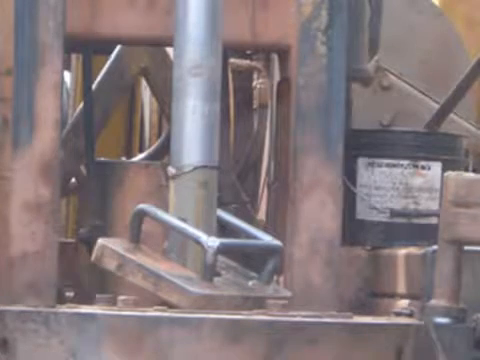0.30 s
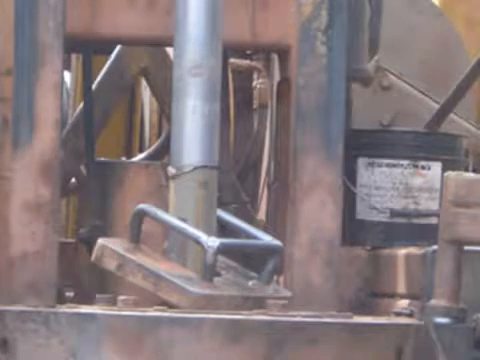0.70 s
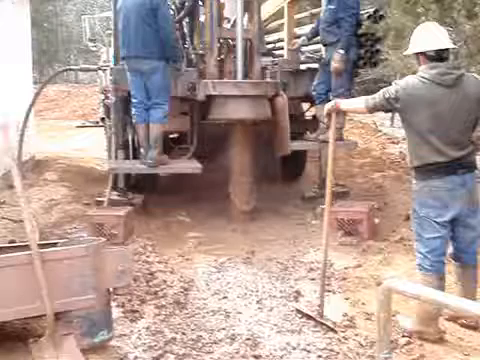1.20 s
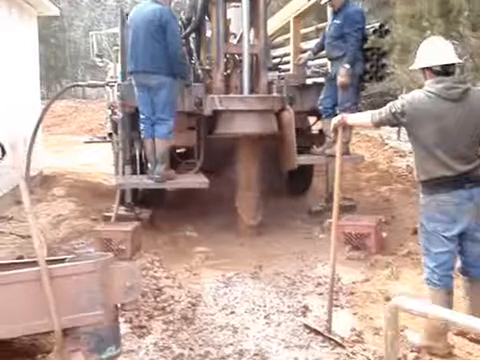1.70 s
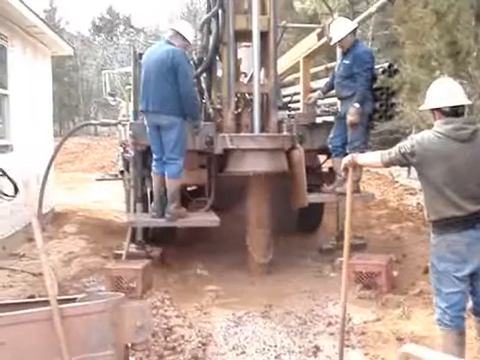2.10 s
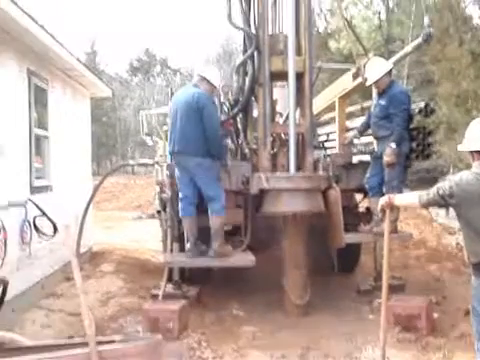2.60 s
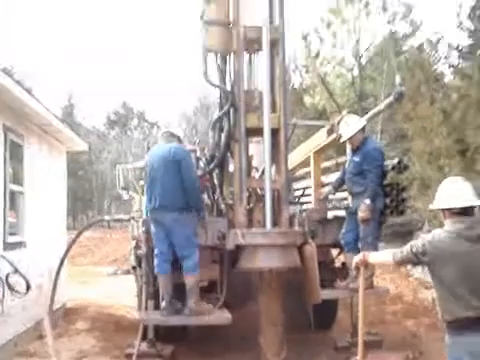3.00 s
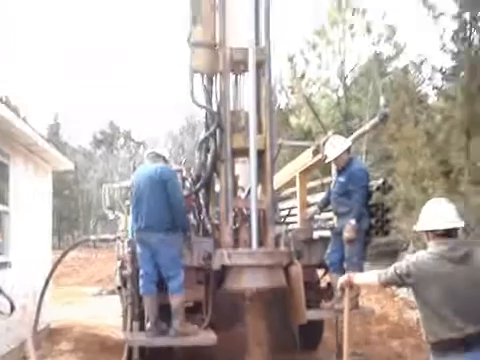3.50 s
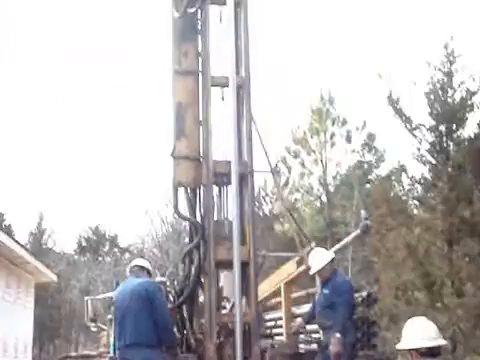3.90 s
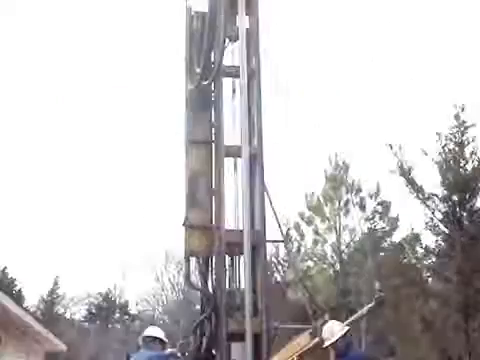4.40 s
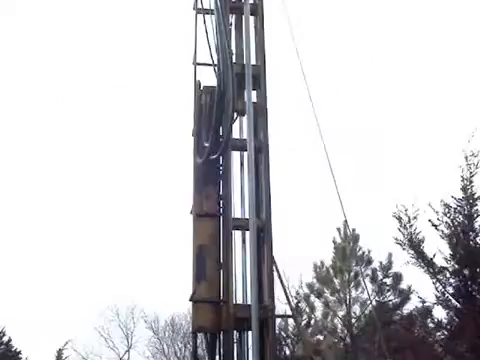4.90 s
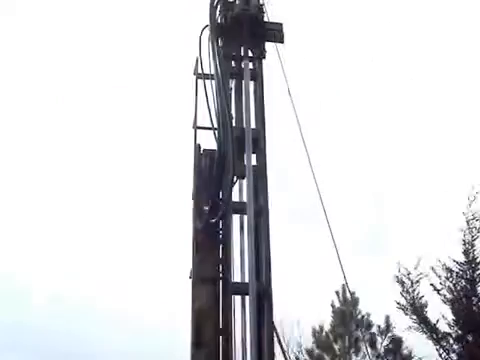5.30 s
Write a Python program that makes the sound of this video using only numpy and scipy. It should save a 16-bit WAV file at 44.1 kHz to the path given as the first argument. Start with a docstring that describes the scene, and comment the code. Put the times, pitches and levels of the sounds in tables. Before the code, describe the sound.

A very faint hiss and low hum last about a second. Then a truck-mounted drilling rig cuts in abruptly, already running outdoors: a loud, steady diesel drone with gear whine, rapid metallic clatter and compressed air hissing from the borehole. As the microphone tilts up the mast, the low rumble thins, the clatter and higher whine come slightly forward, and engine tones swell and fade.

```python
"""Outdoors at a borehole, faint hiss and hum give way abruptly to a truck-mounted drilling rig.
Its diesel turns near 2000 revolutions a minute. The four-stroke cycle spans two turns, so drone,
gear whine and clatter fall on half orders (multiples of half the crank speed). The firing pulses
the exhaust roar and rings the steel; compressed air hisses from the hole. As the microphone tilts up
the mast the rumble thins, clatter and upper whine come forward, and strong tones swell and fade."""
import sys
import numpy as np
from scipy import signal
from scipy.fft import rfft, irfft, next_fast_len
from scipy.io import wavfile

SR = 44100
rng = np.random.default_rng(int(sys.argv[2]) if len(sys.argv) > 2 else 0)


def file_out(sig):
    """Save sig as 16-bit WAV at sys.argv[1]."""
    # one column per channel
    cols = np.atleast_2d(sig).T
    # limit, then scale
    lim = np.clip(cols, -1, 1)
    pcm = np.round(lim * 32767).astype(np.int16)
    wavfile.write(sys.argv[1], SR, pcm)


N = 243873
T = np.arange(N) / SR
RIG_START_S = 1.1855

# Crankshaft speed: time_s, speed_hz
CRANK_SPEED = [(1.2, 33.369), (2, 33.374), (2.8, 33.438), (3.6, 33.493), (4.4, 33.585), (5.0, 33.625),
               (5.53, 33.642)]
# Gear tones and their level at each microphone aim: order, borehole_db, mast_foot_db, up_mast_db
GEAR_TONES = [(27, -52, -35.5, -41), (27.5, -40.5, -43, -48), (28, -46, -44, -39), (30, -49, -50, -39.5),
              (33, -42.5, -40.5, -39.5), (34, -49, -40, -36.5), (35, -34, -48, -43.5),
              (35.5, -43, -40, -43), (41, -41, -47, -52), (42.5, -56, -43, -40.5), (48, -44, -49, -45),
              (58.5, -54, -45, -39), (60.5, -50, -43, -44.5), (65, -54, -46, -44), (67, -50, -46, -46.5)]
# Strong engine and gear tones: order, rows of (time_s, level_db)
SWELLING_TONES = [(12, [(1.2, -30.5), (1.95, -28.5), (2.5, -30.5), (2.85, -36.5), (3.2, -36.5),
                  (3.42, -24.5), (3.8, -46), (4.25, -41), (4.46, -27), (4.85, -40), (5.1, -31), (5.35, -26),
                  (5.53, -37)]), (24, [(1.2, -35), (1.7, -29.5), (2.15, -30.5), (2.4, -32.5), (3.75, -39.5),
                  (3.93, -24.5), (4.2, -35), (4.55, -45), (4.8, -25), (5.0, -33), (5.15, -34),
                  (5.53, -32)]), (40, [(1.2, -31), (1.9, -31), (2.3, -38), (2.7, -47), (3.0, -40),
                  (3.3, -46), (3.6, -32), (4.65, -34.5), (5.0, -46), (5.53, -42)]), (55.5, [(1.2, -50),
                  (2.4, -43), (3.0, -39), (3.7, -33.5), (4.2, -40), (4.45, -40), (4.82, -30), (5.05, -36),
                  (5.26, -29.5), (5.53, -35)]), (60, [(1.2, -44), (1.55, -38), (1.9, -45), (2.8, -44),
                  (3.15, -31), (3.32, -41), (3.46, -31), (3.9, -50), (4.2, -36), (4.8, -36), (5.53, -46)])]


def gain_of(db):
    """Amplitude grows tenfold for every 20 decibels."""
    return 10 ** (np.asarray(db) / 20)


def unit_rms(x):
    """Normalisation to a mean power of 1."""
    return x / np.sqrt(np.mean(abs(x) ** 2) + 1e-20)


def follow(curve):
    """Linear interpolation of (time_s, value) rows at every sample."""
    return np.interp(T, *np.transpose(curve))


def coloured(x, spectrum):
    """Spectral shaping by (frequency_hz, relative_db) rows, at rms 1."""
    hz, db = np.transpose(spectrum)
    size = next_fast_len(N)
    f = np.fft.rfftfreq(size, 1 / SR)
    response = gain_of(np.interp(np.log(f + 1), np.log(hz), db))
    return unit_rms(irfft(rfft(x, size) * response, size)[:N])


def wander(rate_hz, size=2048):
    """Noise low-passed at rate_hz: a smooth fluctuation about zero, at rms 1."""
    f = np.fft.rfftfreq(size, T[-1] / size)
    slow = irfft(rfft(rng.standard_normal(size)) * (f > 0) / (1 + (f / rate_hz) ** 2))
    return np.interp(T, np.linspace(0, T[-1], size), unit_rms(slow))


def crank_tones(table, turns, tilt, gain_db, waver, waver_hz):
    """Shifting air paths modulate the phase and amplitude of crank-locked tones, long waves least."""
    out = np.zeros(N)
    for order, *aim_db in table:
        depth = waver * min(order / 14, 1)  # steadier below order 14
        phase = 2 * np.pi * (order * turns + rng.random()) + depth * wander(waver_hz)
        level = np.interp(tilt, [0, .5, 1], gain_of(aim_db))
        flicker = unit_rms(1 + depth * wander(waver_hz))
        out += level * flicker * np.sqrt(2) * np.cos(phase)
    return gain_of(gain_db) * out


def engine_drone(turns, tilt, knee_hz=250, bass_db_per_octave=7):
    """Periodic exhaust and fan flow gives a harmonic series: a few strong tones over a weaker comb."""
    # Prominent exhaust and fan tones: order, borehole_db, mast_foot_db, up_mast_db
    prominent = [(4.5, -35.3, -35.4, -35.3), (5.5, -41.5, -42, -45.5), (6, -39, -35.3, -36.3),
                 (7, -31.8, -34.5, -36.3), (7.5, -35.5, -35, -34), (8, -35, -36, -38.5),
                 (9, -31.3, -30.5, -33), (10, -40, -40.5, -39.5), (10.5, -38.5, -40, -44),
                 (11, -37, -42, -50), (15, -37, -40, -38), (15.5, -35.5, -37, -41), (16, -29, -36.5, -31.3),
                 (17.5, -37, -43, -44), (18.5, -42, -32.5, -35), (19, -41, -38, -39), (20, -42, -39, -50),
                 (20.5, -52, -44, -37.5), (21, -43, -36.5, -39.5), (25, -42, -44, -37)]
    taken = [row[0] for row in prominent + GEAR_TONES + SWELLING_TONES]
    orders = np.arange(2.5, 24, .5)
    octaves_below = np.maximum(np.log2(knee_hz / (orders * CRANK_SPEED[0][1])), 0)
    is_half_order = orders % 1 > 0
    comb_db = -44 - 2.5 * is_half_order - bass_db_per_octave * octaves_below
    comb = [(order, db, db - 1.25, db - 2.5) for order, db in zip(orders, comb_db) if order not in taken]
    return crank_tones(prominent + comb, turns, tilt, gain_db=.5, waver=.2, waver_hz=1.9)


def gear_whine(turns, tilt):
    """Gear teeth mesh at fixed multiples of the crank speed."""
    return crank_tones(GEAR_TONES, turns, tilt, gain_db=.7, waver=.19, waver_hz=1.8)


def swelling_tones(turns, waver_rad=.2, waver_hz=2.4):
    """The sound field varies with position: strong tones swell and fade as the microphone moves."""
    out = np.zeros(N)
    for order, level_curve in SWELLING_TONES:
        phase = 2 * np.pi * (order * turns + rng.random()) + waver_rad * wander(waver_hz)
        out += gain_of(follow(level_curve)) * np.sqrt(2) * np.cos(phase)
    return out


def pumps(turns, tilt):
    """Gear ratios put the tones of pumps and compressor between the engine's half orders."""
    # Pump and compressor tones: order, borehole_db, mast_foot_db, up_mast_db
    pump_tones = [(18.075, -30.5, -30.2, -32.5), (22.59, -40, -42.5, -43)]
    return crank_tones(pump_tones, turns, tilt, gain_db=1, waver=.2, waver_hz=4)


def firing(turns, depth, spread, cylinders=6):
    """Amplitude modulation by the firing: each cylinder gives one puff a cycle, at its own strength."""
    strength = 1 + spread * unit_rms(rng.standard_normal(cylinders))
    firings = turns / 2 * cylinders
    puff = np.sin(np.pi * np.sqrt(firings % 1)) ** 2
    return unit_rms(1 + depth * puff * strength[firings.astype(int) % cylinders])


def exhaust_roar(puffs, off_ground, surge_db=.5):
    """Turbulent gas makes broadband noise, pulsing with the firing and surging a little."""
    # Exhaust and fan turbulence: frequency_hz, relative_db
    spectrum = [(20, -31.5), (45, -32), (80, -14.5), (105, -19.5), (135, -12.5), (200, -5), (340, -0.5),
                (450, 0.5), (600, 1), (800, 2), (1020, -2), (1200, -3), (1750, -8.5), (2600, -12.5),
                (5000, -34.5)]
    level_db = -19 - 1.24 * off_ground + surge_db * wander(rate_hz=11)
    return coloured(rng.standard_normal(N) * puffs, spectrum) * gain_of(level_db)


def clatter(turns, off_ground, size=2600):
    """Dense knocks repeat every two crank turns, so their spectrum is a comb of half orders."""
    # Injector and valve knocks in the block: frequency_hz, relative_db
    spectrum = [(40, -47), (150, -24.5), (400, -6.5), (800, 0), (1400, 3), (2200, 0), (3200, -11.5),
                (6000, -21), (9000, -44)]
    one_cycle = irfft(np.exp(2j * np.pi * rng.random(size // 2 + 1)))  # flat spectrum, random phases
    knocks = np.interp(turns / 2 % 1, np.linspace(0, 1, size), one_cycle)
    return coloured(knocks, spectrum) * gain_of(-31 + 2.5 * off_ground)


def ringing_steel(puffs, tilt, gain_db=-1.5):
    """Forced vibration: the firing shakes deck and mast, which ring in a few broad resonances."""
    # Resonances of the steel: pitch_hz, width_hz, borehole_db, up_mast_db
    modes = [(829, 50, -51.5, -31.5), (930, 39, -36.5, -33.5), (1189, 71, -33.5, -35),
             (1347, 69, -32, -43.5), (1593, 110, -34.5, -33.5)]
    size = next_fast_len(N)
    f = np.fft.rfftfreq(size, 1 / SR)
    shake = rfft(rng.standard_normal(N) * puffs, size)
    out = np.zeros(N)
    for pitch_hz, width_hz, borehole_db, up_mast_db in modes:
        response = 1 / (1 + 2j * (f - pitch_hz) / width_hz) ** 2
        ring = unit_rms(irfft(shake * response, size)[:N])
        out += ring * gain_of(gain_db + borehole_db + (up_mast_db - borehole_db) * tilt)
    return out


def air_jet(gain_db=3.5, flutter_db=.82):
    """Jet noise: compressed air hisses from the borehole and flutters as cuttings pass through it."""
    # Hiss of the jet: frequency_hz, relative_db
    spectrum = [(300, -27.5), (1000, -13), (2000, 2.5), (2700, 1), (3100, -0.5), (3700, -2), (4800, -3),
                (5800, -7), (6250, -6.5), (6800, -6.5), (7300, -13), (8300, -15), (9200, -33.5),
                (10000, -23)]
    # Strength of the blast: time_s, level_db
    blast = [(1.2, -31.5), (1.47, -30.5), (1.75, -31), (3.65, -30.5), (4.2, -29.5), (4.6, -30.5),
             (5.5, -30)]
    jet = coloured(rng.standard_normal(N), spectrum)
    return jet * gain_of(follow(blast) + gain_db + flutter_db * wander(rate_hz=25))


def rasping(noise, band_hz=(1050, 3200)):
    """Amplitude modulation of one band: the upper middle of the noise surges and sinks."""
    # Surges of the rasp: time_s, gain_db
    surges = [(1.2, 0.3), (1.3, 1), (1.38, -0.5), (1.6, 1), (1.74, -.5), (2.0, 0), (2.25, 0), (2.42, 0),
              (2.74, 1.2), (2.86, -1.2), (3.08, 1), (3.42, 0.3), (3.56, -1), (3.7, 0.5), (4.12, 1),
              (4.23, 3), (4.38, -1), (4.46, 1.5), (4.9, 1.5), (5.25, 1), (5.4, -0.5), (5.53, 1)]
    band = signal.sosfiltfilt(signal.butter(2, band_hz, "band", fs=SR, output="sos"), noise)
    return noise + (gain_of(follow(surges)) - 1) * band


def whistle(turns, order=144, waver_rad=.75):
    """A thin, phase-modulated tone rises out of the masking hiss and sinks back."""
    # Strength of the whistle: time_s, level_db
    level_curve = [(1.2, -54), (1.45, -46), (1.7, -51), (3.3, -52), (3.55, -47), (3.9, -43.5), (4.25, -41),
                   (4.7, -44), (5.0, -50), (5.5, -52)]
    phase = 2 * np.pi * order * turns + waver_rad * wander(rate_hz=7)
    return gain_of(follow(level_curve)) * np.sqrt(2) * np.cos(phase)


def ground_rumble(gain_db=-.5, heave_db=3.5):
    """Vibrating ground and frame radiate lumpy bass, weaker once the microphone turns upward."""
    # Vibration of ground and frame: frequency_hz, relative_db
    spectrum = [(20, -17), (40, -18.5), (60, -9.5), (78, 1.5), (105, -2.5), (170, -12.5), (400, -46.5)]
    # Strength of the rumble: time_s, level_db
    level_curve = [(1.2, -52), (1.9, -47), (2.5, -44), (3.05, -62), (3.4, -53.5), (4.15, -53), (4.38, -67),
                   (4.6, -54), (4.85, -48), (5.0, -63), (5.53, -60)]
    bass = coloured(rng.standard_normal(N), spectrum)
    return bass * gain_of(follow(level_curve) + gain_db + heave_db * wander(rate_hz=6))


def ambience(hum_hz=60, swell_s=.57, swell_width_s=.09, heave_db=1.2):
    """The noise floor, later masked by the rig: low hum, heaving bass and a hiss that swells once."""
    # Swell of the hiss: frequency_hz, relative_db
    swell_spectrum = [(800, -18), (2300, 0), (6000, -3), (10000, -18)]
    # Background noise: frequency_hz, relative_db
    floor_spectrum = [(12, -31), (20, -2), (66, -9), (88, -14.5), (159, -23.5), (191, -17), (217, -25.5),
                      (247, -21), (320, -24.5), (772, -29.5), (2750, -29.5), (7550, -33), (9780, -37),
                      (12700, -46), (21500, -120)]
    hum = np.sqrt(2) * np.sin(2 * np.pi * hum_hz * T) * gain_of(-70 + 1.5 * wander(rate_hz=4))
    envelope = gain_of(-73) * np.exp(-((T - swell_s) / swell_width_s) ** 2)
    swell = envelope * coloured(rng.standard_normal(N), swell_spectrum)
    floor = gain_of(-62) * coloured(rng.standard_normal(N), floor_spectrum)
    bass = signal.sosfiltfilt(signal.butter(2, 600, fs=SR, output="sos"), floor)
    return hum + swell + floor + (gain_of(heave_db * wander(rate_hz=5)) - 1) * bass


def scene():
    """Superposition: one crankshaft times the tones, knocks and puffs; air and rumble sound alongside."""
    # Microphone aim: time_s, tilt (0 = borehole, .5 = foot of the mast, 1 = up the mast)
    aim = [(1.2, 0), (2.6, 0.02), (3.3, 0.28), (3.9, 0.5), (4.35, 0.55), (4.9, 0.95), (5.5, 1)]
    tilt = follow(aim)
    off_ground = np.minimum(2 * tilt, 1)
    speed_hz = follow(CRANK_SPEED) * (1 + .0002 * wander(rate_hz=8.6))
    turns = np.cumsum(speed_hz) / SR
    tones = engine_drone(turns, tilt) + gear_whine(turns, tilt) + swelling_tones(turns)
    tones += pumps(turns, tilt) + whistle(turns)
    knocks = clatter(turns, off_ground)
    puffs = firing(turns, depth=.21, spread=.99)
    steel = ringing_steel(puffs, tilt)
    exhaust = exhaust_roar(puffs, off_ground)
    rumble = ground_rumble()
    rig = tones + rumble + rasping(knocks + exhaust + steel + air_jet())
    onset = np.clip((T - RIG_START_S) / .0004, 0, 1)
    dip_db = -1.5 * np.exp(-((T - 2.91) / .042) ** 2)  # the level dips briefly
    return (ambience() + onset * gain_of(dip_db) * rig)[None]


def record(dry, opening_cutoff_hz=11900, rig_cutoff_hz=9950):
    """Asymmetric saturation: the microphone rounds upward peaks sooner; filters then limit the band."""
    ceiling = np.where(dry > 0, .72, .95)
    rounded = ceiling * np.tanh(dry / ceiling)
    rounded = signal.sosfilt(signal.butter(2, 20, "high", fs=SR, output="sos"), rounded)
    lowpasses = [signal.firwin(511, hz, window=("kaiser", 9), fs=SR)
                 for hz in (opening_cutoff_hz, rig_cutoff_hz)]
    opening, rig = (signal.oaconvolve(rounded, taps[None], "same") for taps in lowpasses)
    return np.where(T < RIG_START_S, opening, rig)


dry = scene()
out = record(dry)
file_out(out)
```